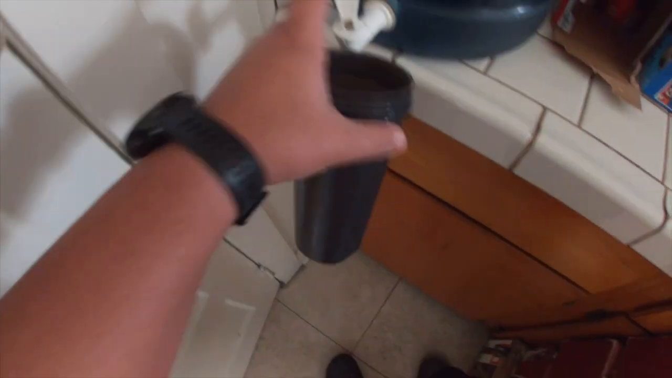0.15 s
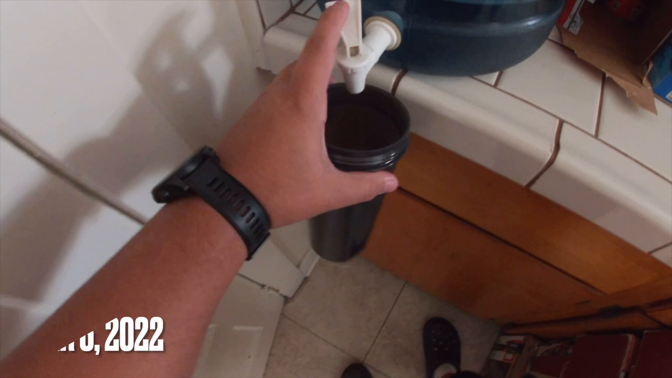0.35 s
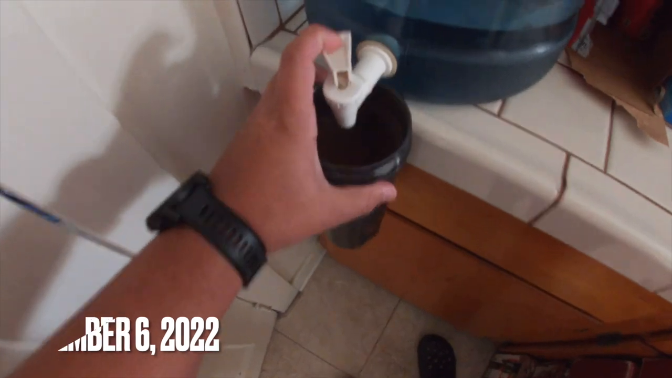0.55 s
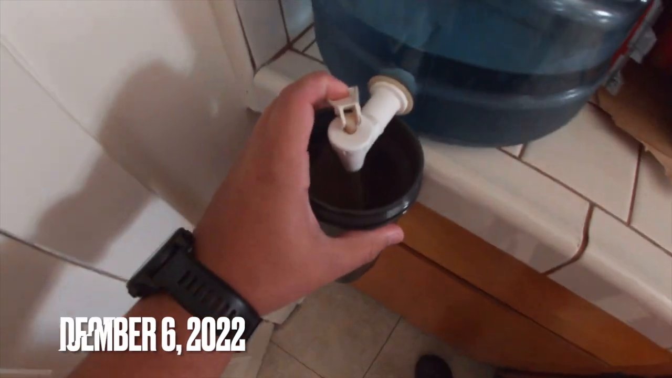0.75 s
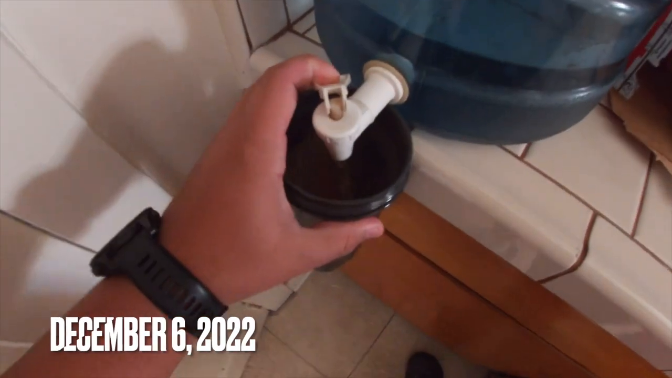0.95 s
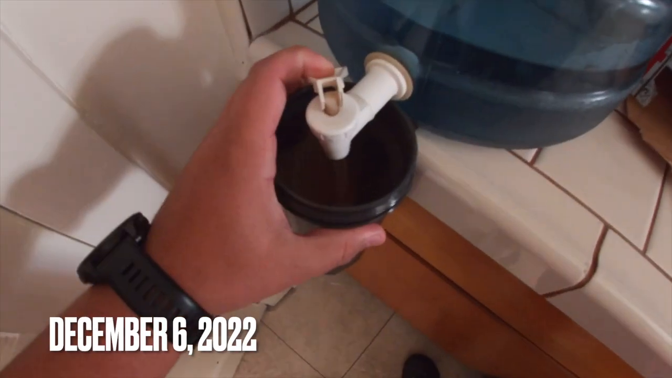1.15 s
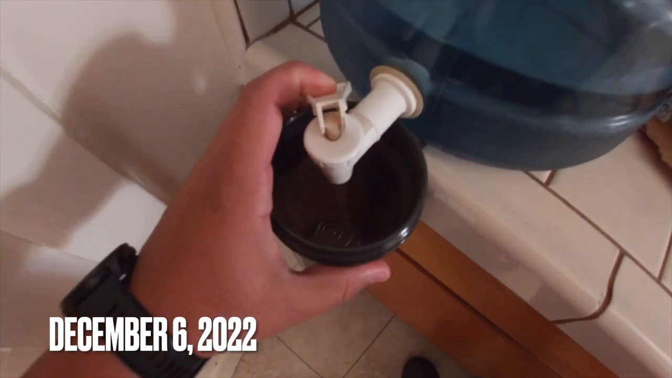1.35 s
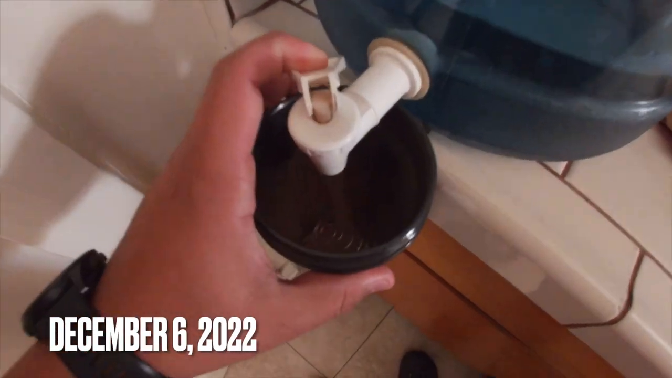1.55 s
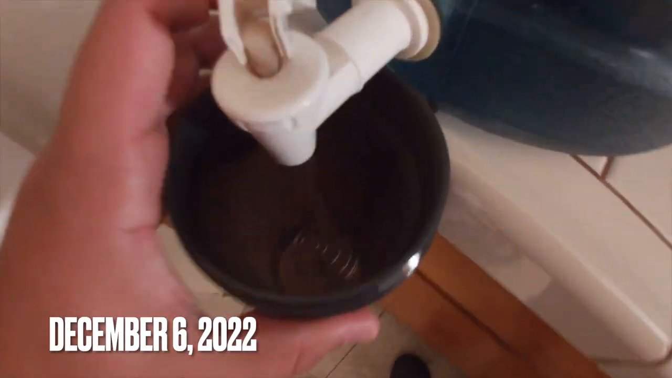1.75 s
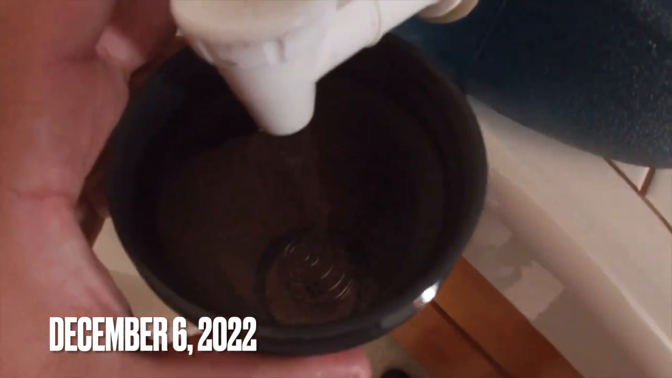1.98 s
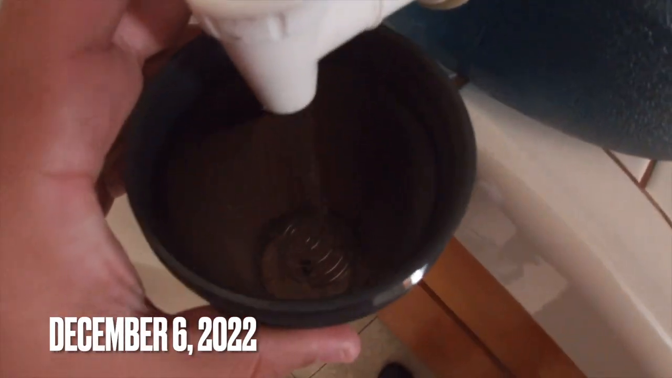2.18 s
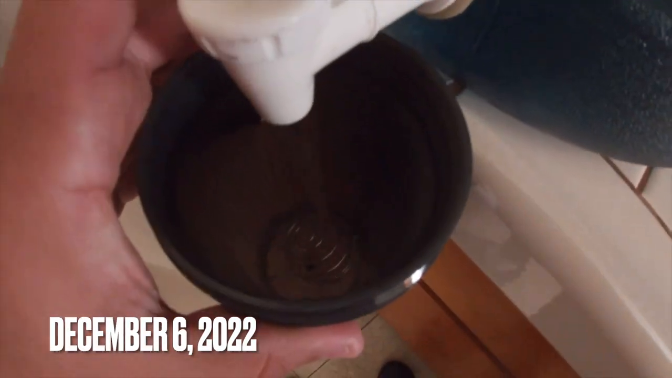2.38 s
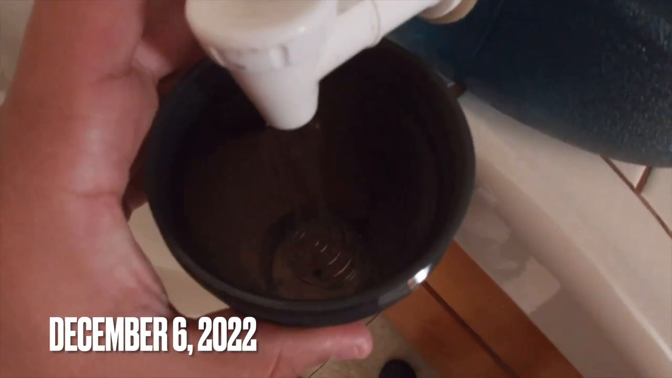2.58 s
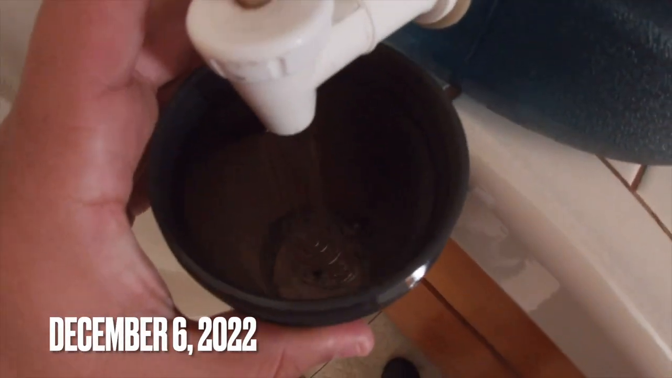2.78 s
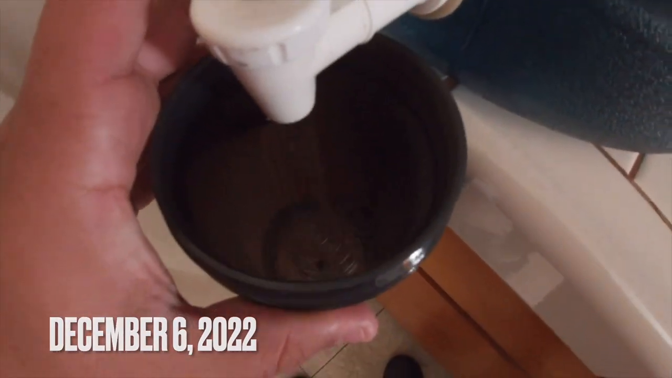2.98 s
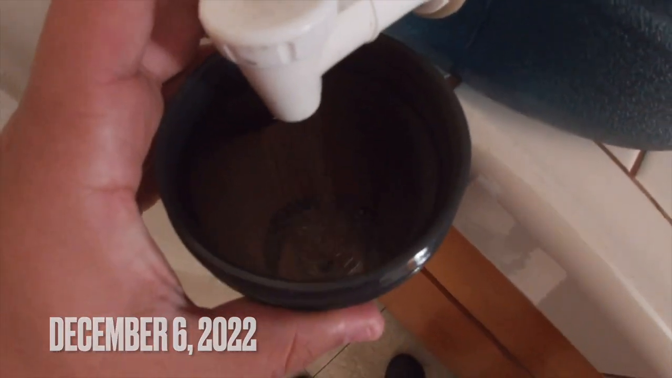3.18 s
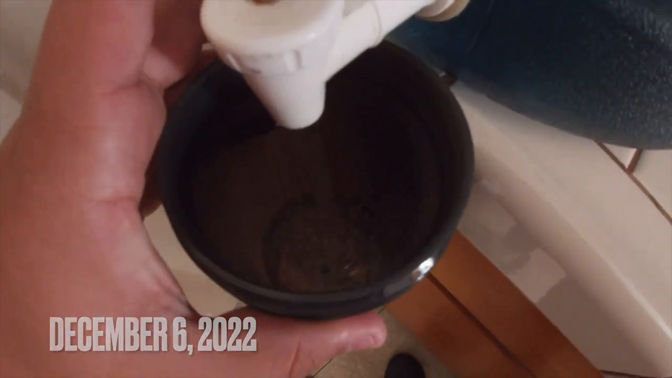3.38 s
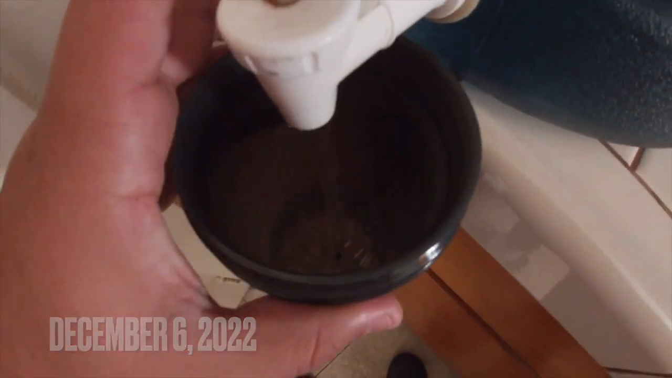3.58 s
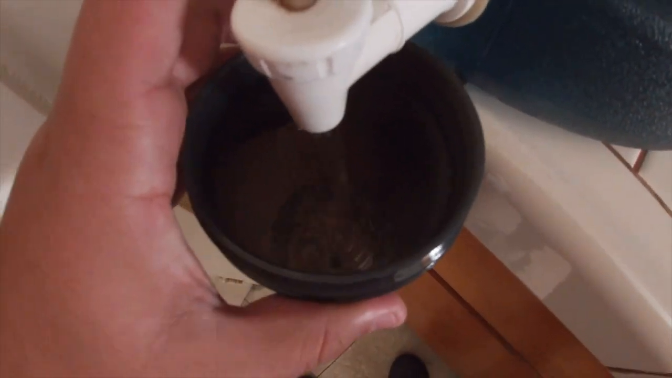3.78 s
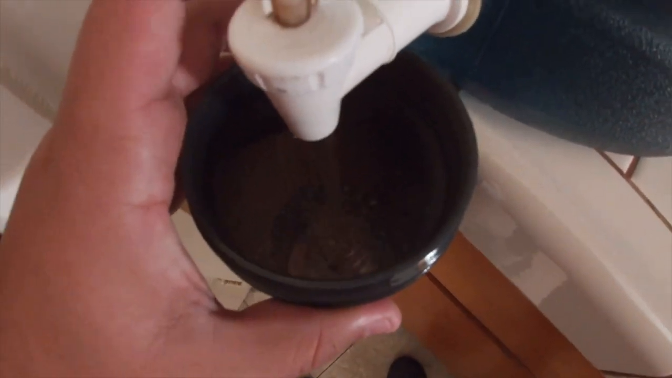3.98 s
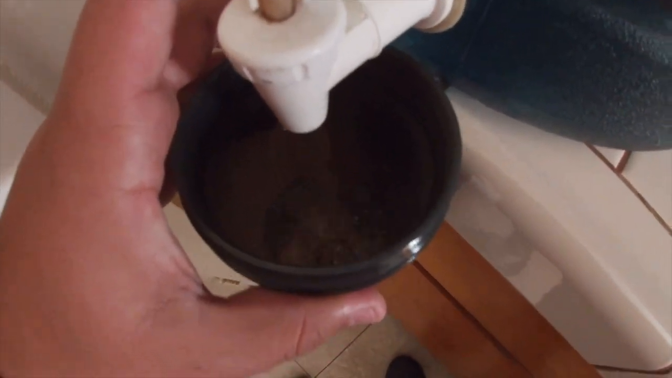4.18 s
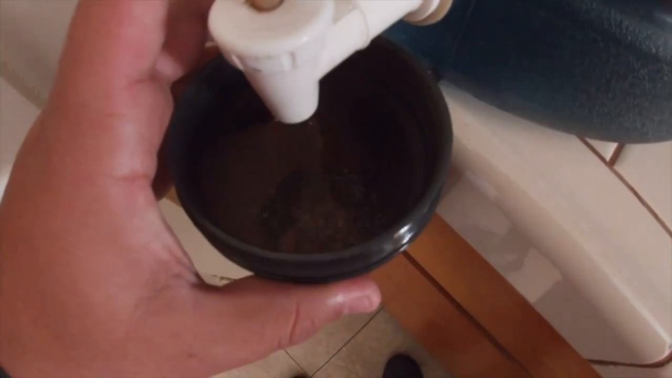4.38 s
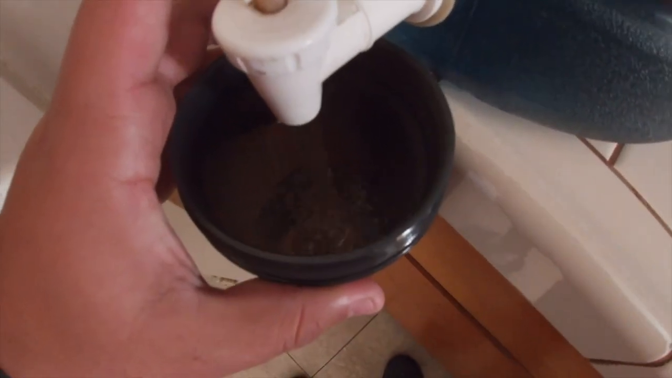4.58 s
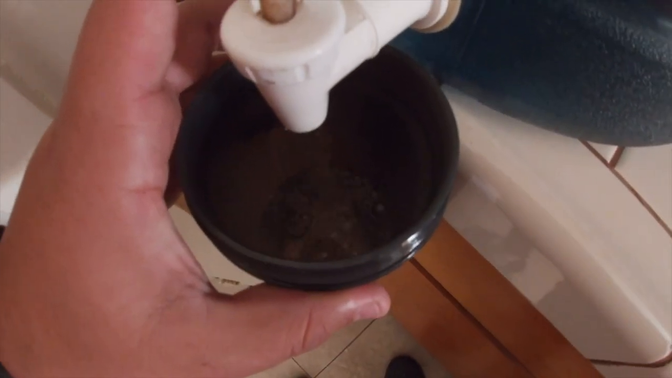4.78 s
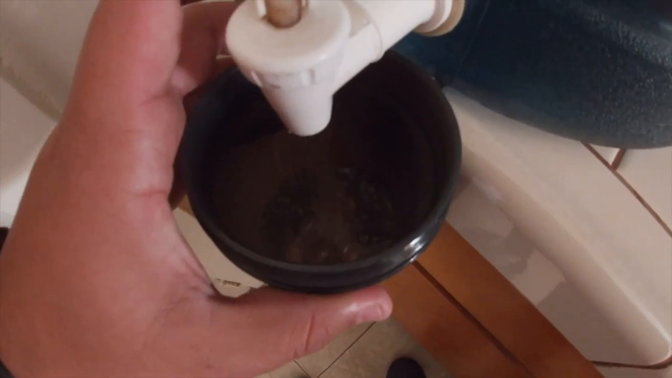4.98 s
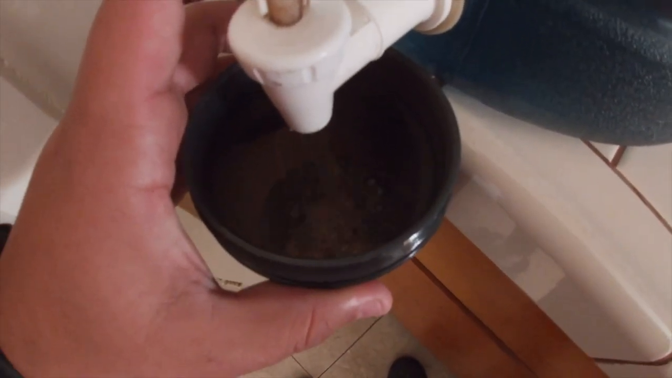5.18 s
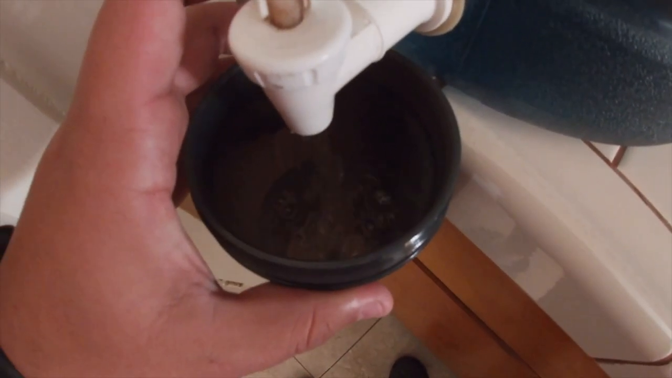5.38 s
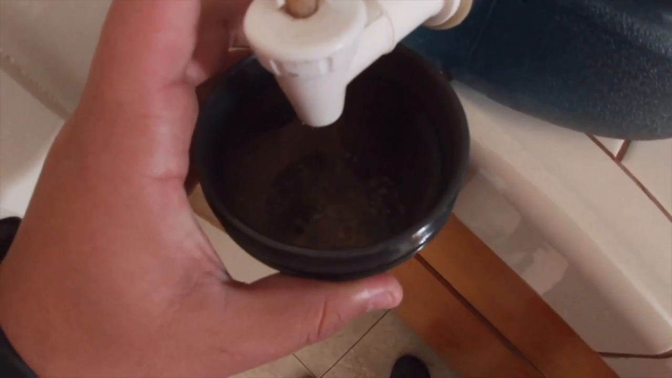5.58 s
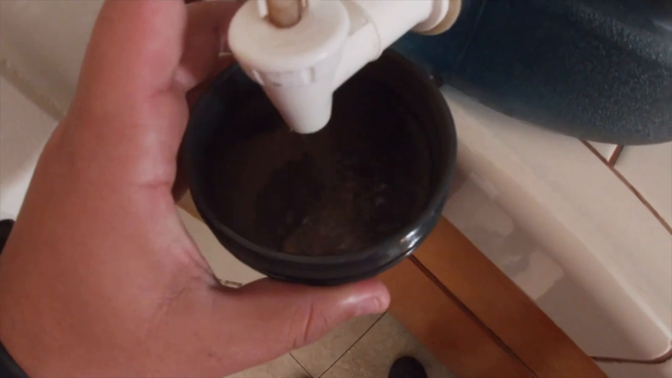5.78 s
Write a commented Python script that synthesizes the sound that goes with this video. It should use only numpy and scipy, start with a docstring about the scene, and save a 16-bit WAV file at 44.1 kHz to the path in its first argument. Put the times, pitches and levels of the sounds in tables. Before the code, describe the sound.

Close up in a small tiled kitchen, fingers slip and tick on an empty plastic bottle, which bumps the dispenser stand. A tap lever clunks open with a dull thump. Water drums briefly on the bare bottom, then turns into a steady bubbly gurgle with crisp splashes, its hollow note mostly rising until the end. Low room rumble lies underneath.

```python
"""In a kitchen, a plastic shaker bottle is brought up to a water dispenser and filled.
Ringing modes, a thump and a noise crack make it bump the stand; then the tap opens with a thump.
The stream first drums on the bare bottom, as filtered noise bursts, then plunges into the rising water.
Splashes throw spray, trap chirping bubbles and kick the air column, whose pitch mostly climbs as the bottle fills.
Finger slips and ticks, room echo, a low rumble of noise and a late, faint hum complete the scene."""
import sys
import numpy as np
from scipy import signal
from scipy.fft import rfft, irfft, next_fast_len
from scipy.io import wavfile
from scipy.ndimage import uniform_filter1d, map_coordinates

SR = 44100
rng = np.random.default_rng(int(sys.argv[2]) if len(sys.argv) > 2 else 0)


def generate_wav(sig):
    """Save sig (samples, or channels by samples) to the path in sys.argv[1] as 16-bit PCM at SR."""
    pcm = np.round(np.clip(np.atleast_2d(sig).T, -1, 1) * 32767).astype(np.int16)
    wavfile.write(sys.argv[1], SR, pcm)


N = 257741  # length [samples]

TOP_HZ = 16100  # upper limit of the sound
FLOW_S = 0.742  # the tap opens

# how hard the stream churns the water: (time [s], level [dB])
CHURNING = [(1.0, -85), (1.08, -41.5), (1.31, -38), (1.79, -34.5), (2.08, -36), (2.44, -34), (2.9, -38.5),
            (4.03, -37), (4.18, -41.5), (5.19, -36), (5.64, -48), (5.84, -41)]
# colour of knocks and rubbing on plastic: (frequency [Hz], level [dB])
PLASTIC_COLOUR = [(240, -26), (400, -13.5), (670, -22), (867, -9), (1350, -30), (2290, -9.5), (3010, -15.5),
                  (3720, -22.5), (4070, -20.5), (5270, -22), (6320, -17), (10700, -24.5), (15000, -38)]


def stream():
    """Small splashes feed the column, bubbles, slaps and spray; bubble pitches spread as the water deepens."""
    # the slap of the stream on the water: (frequency [Hz], level [dB])
    slap_colour = [(450, -34), (1000, -6), (1600, -1.5), (2800, 3.5), (4000, -1), (5500, 4), (12000, -31)]
    column_db, bubble_db, slap_db = -.5, -4, -8.5  # shares of the churning
    deep_s, shallow_db_per_s = 1.334, 84  # the air column is weaker before the water is deep
    short_s, short_db_per_s = 4.19, 2  # it weakens again once the column is short
    spray_db, spray_peak_s = -37, 1.97
    spray_rise_db_per_s, spray_fade_db_per_s = 10.5, 3  # spray grows, then fades as the fall shortens
    thinning_s, thinning_per_s = 2.1, .36  # from then on splashes come ever less often

    s, size_db = chance(rate=800, spread_db=6.5)
    happens = rng.random(len(s)) < np.exp(-thinning_per_s * (s - thinning_s))
    s, size_db = s[happens], size_db[happens]
    luck = 2 * rng.random((len(s), 7)) - 1

    column = steady(air_column(s, 1.12 * size_db + 3 * luck[:, 0]))

    # a bubble pinches off, and a droplet lands, some milliseconds from the splash
    pinch_off = s + .003 * (1 + luck[:, 5])
    bubble_spread = np.interp(s, [1.5, 4.5], [.22, .43])
    bubble_hz = 2700 * np.exp(bubble_spread * luck[:, 2])
    gurgle = steady(bubbles(pinch_off, size_db + 6 * luck[:, 1], bubble_hz))

    landing = s + .003 * luck[:, 6]
    drop_hz = 8700 * np.exp(0.485 * luck[:, 4])
    drops = steady(spray(landing, size_db + 8 * luck[:, 3], drop_hz))
    slaps = steady(coloured(bursts(s, size_db, t60=0.0088), slap_colour))

    t = clock()
    shallow_loss = shallow_db_per_s * np.maximum(deep_s - t, 0)
    short_loss = short_db_per_s * np.maximum(t - short_s, 0)
    column_gain = amp(column_db - shallow_loss - short_loss)
    spray_gain = amp(spray_db - spray_rise_db_per_s * np.maximum(spray_peak_s - t, 0))
    spray_gain = spray_gain * envelope(FLOW_S, deep_s - FLOW_S, spray_peak_s, spray_fade_db_per_s)
    churned = column_gain * column + amp(bubble_db) * gurgle + amp(slap_db) * slaps
    return gains(CHURNING)[0] * churned + spray_gain * drops


def loud_splashes():
    """The larger splashes, one by one: a drop strikes, then its crater closes and kicks the air again."""
    # (time [s], spray level [dB], air column level [dB], bubble level [dB],
    #  bubble pitch before its rise and small offset [Hz], spray pitch before its scatter [Hz])
    splash_list = [(0.9634, -19.5, -44, -53, 3330, 7000), (1.056, -12.5, -69, -51, 3550, 7140),
                   (1.1012, -10, -51, -37, 3200, 7160), (1.3177, -10, -40, -28.5, 2670, 7350),
                   (1.3454, -27, -27.5, -31, 3040, 6750), (1.5176, -20.5, -25.5, -26.5, 2820, 6260),
                   (1.6102, -21.5, -29, -28.5, 2710, 6700), (1.7298, -29, -18.5, -26.5, 2840, 7420),
                   (1.7523, -41, -24, -31, 2420, 7210), (1.7846, -27, -20, -28, 2620, 5430),
                   (1.8501, -38, -24, -37, 2750, 7500), (1.8864, -23, -23, -43, 2760, 7340),
                   (1.9064, -21, -24, -46, 2680, 7400), (2.0657, -11, -24.5, -25.5, 2930, 7470),
                   (2.1778, -14, -25, -26, 2900, 8200), (2.2359, -34, -25.5, -29, 2680, 5380),
                   (2.3143, -28, -24, -35, 2700, 11300), (2.3845, -17, -25.5, -26.5, 2860, 7950),
                   (2.4186, -20, -21.5, -29, 2980, 15100), (2.4529, -51, -21.5, -25, 3100, 5300),
                   (2.4868, -14, -39, -26, 2850, 7830), (2.508, -16, -21.5, -29, 2900, 11800),
                   (2.6328, -26, -24, -25.5, 2400, 9140), (2.6433, -23, -28, -23.5, 2930, 9110),
                   (2.6958, -13.5, -44, -31, 3020, 7530), (2.7222, -15.5, -21, -34, 3170, 7900),
                   (2.803, -15, -36, -35.5, 3070, 7640), (2.871, -18, -37, -33, 2890, 13500),
                   (3.0942, -15, -29.5, -35, 3030, 9300), (3.1259, -31, -24, -36, 3160, 6170),
                   (3.1615, -21, -30.5, -22.5, 3220, 5500), (3.2032, -19.5, -26, -30.5, 2960, 6440),
                   (3.3595, -14, -23.5, -29, 2870, 8900), (3.3874, -20, -21.5, -35, 2250, 6440),
                   (3.452, -23, -20, -33, 2920, 8140), (3.6038, -31, -25.5, -29.5, 2500, 8440),
                   (3.7831, -12.5, -28, -32, 3680, 12700), (3.8766, -42, -19.5, -32, 2360, 6940),
                   (4.0004, -14, -30, -28.5, 3900, 6010), (4.0422, -12, -26.5, -27, 3800, 12200),
                   (4.1336, -18, -45, -30.5, 2430, 14600), (4.1634, -13.5, -21.5, -30, 2600, 7850),
                   (4.1948, -15, -23, -36, 3350, 6680), (4.359, -22.5, -25.5, -30.5, 3020, 5730),
                   (4.3742, -17, -29.5, -26, 2440, 12700), (4.7007, -16, -23.5, -31.5, 3960, 5290),
                   (4.7725, -21.5, -24.5, -36, 2180, 5440), (4.8822, -17, -32, -32, 1890, 12000),
                   (4.9549, -20.5, -26, -30, 3780, 12000), (5.1023, -23.5, -24, -44, 2290, 8100),
                   (5.165, -12.5, -31, -36, 1900, 6700), (5.185, -30, -23, -32, 2280, 7600),
                   (5.321, -16.5, -24, -29, 2160, 12200), (5.369, -13, -29, -37, 3940, 15400),
                   (5.439, -11, -32, -35, 2030, 5660), (5.4891, -20, -30, -32.5, 3860, 5800),
                   (5.7166, -17, -40, -54, 2160, 7730), (5.7677, -22, -58, -33.5, 2450, 5500)]
    collapse_s, collapse_db = 0.004507, -6  # delay before random stretching; change of the second kick
    s, spray_db, column_db, bubble_db, bubble_hz, spray_hz = np.transpose(splash_list)
    closing = s + collapse_s * rng.uniform(0.624, 1.384, len(s))
    first_kick = air_column(s, column_db + 6.5)
    second_kick = air_column(closing, column_db + 3.5 + collapse_db)
    ringing = bubbles(s, bubble_db + 10, bubble_hz)
    return first_kick + second_kick + ringing + spray(s, spray_db - 3.5, spray_hz)


def chirps():
    """Some bubbles ring on longer while they rise, each a clear upward chirp, at random moments."""
    s, size_db = chance(rate=26, spread_db=4)
    hz = 3054 * np.exp(0.255 * rng.uniform(-0.914, 1, len(s)))
    t60 = np.full(len(s), 0.0256)
    ring = pings(s, size_db + 2.5, hz, t60, glide=0.38, attack=0.0018, size=1600)
    return gains(CHURNING)[0] * ring


def air_column(times, db):
    """Splashes kick the air above the water, whose rocking surface bends the note; a wall mode adds a little."""
    # the air column's middle note: (time [s], pitch [Hz])
    column_note = [(.9, 834), (1.35, 927), (1.6, 947), (1.9, 967), (2.15, 1058), (2.65, 1020), (2.95, 1072),
                   (3.3, 1191), (3.8, 1252), (4.4, 1257), (4.7, 1342), (5.3, 1448), (5.84, 1630)]
    luck = rng.standard_normal((len(times), 3)).clip(-2, 2)
    hz = np.interp(times, *np.transpose(column_note)) * np.exp(.025 * luck[:, 0])
    t60 = 0.034 * np.exp(0.083 * luck[:, 1])
    air = pings(times, db, hz, t60, glide=0.0055, attack=.0001, size=2200)
    wall_hz = 715 * np.exp(0.05 * luck[:, 2])
    wall_t60 = np.full(len(times), .026)
    wall = pings(times, db - 17.5, wall_hz, wall_t60, glide=0, attack=0.00007, size=1200)
    return air + wall


def bubbles(times, db, hz):
    """Trapped bubbles ring briefly and chirp upward as they near the surface."""
    t60 = 31 / hz * np.exp(.5 * rng.uniform(-1, 1, len(times)))
    return pings(times, db, hz * 0.9605, t60, glide=0.21, attack=0.0001, size=1000)


def spray(times, db, hz, count=3):
    """A droplet snaps and rattles between the walls, beside a quick cluster of tiny, mostly weakening bubbles."""
    luck = rng.uniform(-1, 1, (len(times), 3, count))
    turn = np.arange(count)
    born = times[:, None] + 0.0021 * turn * (1 + .5 * luck[:, 0])
    # the first bubble keeps the given pitch; later ones scatter around it
    pitch = hz[:, None] * np.exp(0.417 * luck[:, 1] * (turn > 0))
    pitch = np.minimum(pitch, TOP_HZ).ravel()
    size_db = db[:, None] - 4.1 * turn + 2 * luck[:, 2]
    fizz = pings(born.ravel(), size_db.ravel(), pitch * .96, 58 / pitch, glide=0.2, attack=0.000043, size=450)
    snap = bursts(times, db - 9.5, t60=0.0052)
    rattle = bursts(times, db - 19.0, t60=0.047)
    return fizz + snap + rattle


def patter():
    """Drops drum on the bare plastic and burst into spray, muffled as water covers it."""
    # the bare bottom's answer to a drop: (frequency [Hz], level [dB])
    bottom_colour = [(150, -1), (330, 12), (500, 10), (680, -3), (920, 2.5), (1250, -26.5), (1900, -19.5),
                     (2900, -10), (4200, -16.5), (7100, -5.5), (10000, -11), (16000, -18.5)]
    attack_s, covered_s, cover_db_per_s = .06, 1.17, 37
    s, size_db = chance(rate=600, spread_db=4.5)
    drumming = steady(coloured(bursts(s, size_db, t60=0.002), bottom_colour))
    spray_hz = 7000 * np.exp(0.16 * rng.standard_normal(len(s)))
    spatter = steady(coloured(spray(s, size_db, spray_hz), bottom_colour))
    gain = amp(-37.5) * envelope(FLOW_S, attack_s, covered_s, cover_db_per_s)
    return gain * (drumming + amp(-1) * spatter)


def knocks():
    """Each knock rings the stand's modes, mixed by where it lands, with a dull thump and a crack."""
    # (time [s], ring level [dB], crack level [dB], thump level [dB],
    #  place [0 = side of the stand, 1 = tap])
    knock_list = [(0.2153, -23, -25.5, -24, 0.02), (0.7195, -16, -43, 3, 0.82),
                  (1.077, -41.5, -60, -29, 0.24)]
    # modes of the dispenser and its stand: (frequency [Hz], time to fall 60 dB [s],
    #  level when bumped [dB], level when the tap opens [dB])
    stand_modes = [(202, 0.42, -24, -36), (262, 0.18, -9, -15.5), (318.5, 0.25, -0.5, -9),
                   (386, 0.046, 7, 6.5), (435.6, 0.15, 3.5, -13), (473.7, 0.32, 0, -12),
                   (565, 0.2, -12.5, 2), (730, 0.066, 0.5, -14), (793, 0.32, -20.5, -14),
                   (837, 0.029, 8, 13), (879, 0.14, -1, -4), (1024, 0.053, 3.5, 0.5),
                   (1092, 0.107, -5, -32), (1328, .12, -7.5, -15), (1553, .12, -12.5, -25),
                   (2530, .06, -20, -27)]
    hz, t60, bump_db, tap_db = np.transpose(stand_modes)
    out = np.zeros(N)
    for s, db, crack_db, thump_db, at_tap in knock_list:
        mode_db = bump_db + np.clip(at_tap, 0, 1) * (tap_db - bump_db)
        arrival = s + rng.uniform(0, 0.00189, len(hz))  # the blow takes a moment to spread
        out += pings(arrival, db + mode_db, hz, t60, glide=0, attack=0.001, size=18000)
        time = np.array([s])
        out += pings(time, np.array([thump_db]), np.array([680]), np.array([.011]),
                     glide=0, attack=0.0015, size=1500)
        crack = bursts(time, np.array([crack_db + 22.5]), t60=0.058, size=5000)
        out += coloured(crack, PLASTIC_COLOUR)
    return out


def handling():
    """Skin slips on the empty bottle and faintly sounds its air column, with a few sharper ticks."""
    # fingers shift on the bottle: (time [s], length [s], level [dB])
    grip_list = [(0.0, 0.044, -42.5), (0.234, 0.06, -41.5), (0.435, 0.071, -44), (0.557, 0.035, -44.5)]
    # small plastic ticks of bottle and lever: (time [s], level [dB])
    tick_list = [(0.0157, -34), (0.0632, -38), (0.149, -34.5), (0.186, -27), (0.2294, -22), (0.299, -24.5),
                 (0.4373, -29.5), (0.4418, -19.5), (0.4917, -21.5), (0.5913, -21), (0.6222, -33.5),
                 (0.649, -46), (0.717, -19), (0.737, -16.5), (0.772, -14.5)]
    # the air in the empty bottle: (frequency [Hz], time to fall 60 dB [s], level [dB])
    hollow_modes = [(878, 0.063, -6), (2430, 0.026, -10)]
    attack_s, release_db_per_s = 0.0027, 416

    rub = np.zeros(N)
    for start, length, grip_db in grip_list:
        rub += amp(grip_db) * envelope(start, attack_s, start + length, release_db_per_s)
    slip_times, slip_db = chance(rate=560, spread_db=8.0)
    slips = rub * steady(coloured(bursts(slip_times, slip_db, t60=0.0065), PLASTIC_COLOUR))

    drive = rub * rng.standard_normal(N)
    t = clock()[:SR // 4]
    hollow = np.zeros(N)
    for hz, t60, mode_db in hollow_modes:
        ring = np.sin(2 * np.pi * hz * t) * np.exp(-np.log(1000) * t / t60)
        hollow += amp(mode_db) * signal.fftconvolve(drive, ring / np.linalg.norm(ring))[:N]

    s, db = np.transpose(tick_list)
    ticks = coloured(bursts(s, db + 12, t60=0.028), PLASTIC_COLOUR) + air_column(s, db - 29)
    return amp(-3.5) * slips + hollow + ticks


def room(x):
    """The tiled kitchen answers with decaying noise, 5 ms late, its fading time set by frequency."""
    # (frequency [Hz], time to fall 60 dB [s])
    kitchen_decay = [(150, 0.55), (500, 0.27), (2000, 0.31), (8000, 0.4), (16000, 0.047)]
    hz, t, z = signal.stft(rng.standard_normal(SR // 2), SR, nperseg=256)
    fading = amp(-60 * t / along(kitchen_decay, hz)[:, None])
    tail = signal.istft(z * fading, SR, nperseg=256)[1]
    delayed = np.pad(tail, (SR // 200, 0))
    return signal.fftconvolve(x, delayed / np.linalg.norm(tail))[:N]


def background():
    """A low rumble of coloured noise fills the kitchen; late on, a faint wavering sine hum drifts in."""
    # colour of the rumble: (frequency [Hz], level [dB])
    ambient_colour = [(20, -5), (45, -0.5), (85, -0.5), (150, -10), (230, -13), (350, -9.5), (550, -19),
                      (1000, -29.5), (3000, -31.5), (8000, -44), (16000, -52)]
    # rumble level before a fixed boost: (time [s], level [dB])
    rumble_level = [(0.0, -50.5), (0.39, -50.5), (2.67, -60), (4.63, -55.5), (4.7, -54.5), (5.34, -56.5),
                    (5.84, -55.5)]
    hum_hz, hum_waver, hum_db = 250, 0.025, -60  # waver as a share of the pitch
    hum_start_s, hum_attack_s = 4.08, 0.51
    t = clock()
    noise = unit(coloured(rng.standard_normal(N), ambient_colour))
    rumble = amp(3.5) * gains(rumble_level)[0] * noise
    # smooth random curve through four points a second
    waver = map_coordinates(rng.standard_normal(size=32), [t * 4], mode="mirror")
    phase = 2 * np.pi * np.cumsum(hum_hz * (1 + hum_waver * waver)) / SR
    hum = amp(hum_db) * np.clip((t - hum_start_s) / hum_attack_s, 0, 1) * np.sin(phase)
    return rumble + hum


def pings(times, db, hz, t60, glide, attack, size):
    """Damped sines: they fall 60 dB in t60 while their pitch rises by the share glide."""
    t = np.arange(size) / SR
    age = t / t60[:, None]
    phase = 2 * np.pi * hz[:, None] * t * (1 + glide * np.minimum(age, 2) / 2)
    shape = np.exp(-np.log(1000) * age) * (1 - np.exp(-t / attack))
    return place(times, amp(db)[:, None] * np.sin(phase) * shape)


def bursts(times, db, t60, size=600):
    """Short cracks of noise that die away evenly in dB."""
    decay = np.exp(-np.log(1000) * np.arange(size) / SR / t60)
    noise = rng.standard_normal((len(times), size))
    return place(times, amp(db)[:, None] * decay * noise)


def place(times, grains):
    """Sum of one grain (row) at each time."""
    start = np.round(times * SR).astype(int).clip(0)
    index = start[:, None] + np.arange(grains.shape[1])
    return np.bincount(index.ravel(), grains.ravel(), N)[:N]


def chance(rate, spread_db):
    """Random times (rate per second) and bell-curve sizes (dB, capped above) of irregular impacts."""
    times = np.sort(rng.uniform(0, N / SR, int(rate * N / SR)))
    return times, spread_db * np.minimum(rng.standard_normal(len(times)), 1.7)


def coloured(x, points, size=8192):
    """x through a filter with the given spectrum that never sounds ahead of its input."""
    spectrum = amp(along(points, np.fft.rfftfreq(size, 1 / SR)))
    cepstrum = irfft(np.log(spectrum + 1e-6))
    # folding the cepstrum forward gives minimum phase
    cepstrum[1:size // 2] *= 2
    cepstrum[size // 2 + 1:] = 0
    return signal.fftconvolve(x, irfft(np.exp(rfft(cepstrum))))[:N]


def steady(x):
    """x with its slow level, over a quarter second, held near rms 1."""
    return x / np.sqrt(np.abs(uniform_filter1d(x ** 2, SR // 4)) + 1e-12)


def unit(x):
    """x scaled to rms 1."""
    return x / np.sqrt(np.mean(x ** 2) + 1e-20)


def amp(db):
    """Decibels to an amplitude factor."""
    return 10 ** (np.asarray(db) / 20)


def along(points, hz):
    """Values between (Hz, value) points on a log axis."""
    f, v = np.transpose(points)
    return np.interp(np.log(hz + 1), np.log(f), v)


def gains(rows):
    """One gain per sample for each dB column, at -120 dB before the first row."""
    s, *cols = np.transpose(rows)
    return np.array([amp(np.interp(clock(), s, c, left=-120)) for c in cols])


def clock():
    """The time of every sample [s]."""
    return np.arange(N) / SR


def envelope(start, attack, end, release_db_per_s):
    """A gain that rises from start, holds until end, then dies away."""
    t = clock()
    return np.clip((t - start) / attack, 0, 1) * amp(-release_db_per_s * np.maximum(t - end, 0))


def scene():
    """Water coloured by the bottle, plastic noises, their room echoes and the background."""
    # the bottle's colour on the water: (frequency [Hz], level [dB])
    bottle_colour = [(140, -35), (300, -10), (560, -10), (720, -4), (1450, -1), (1850, -2.5), (2300, -2),
                     (3200, 2.5), (3500, -3), (4100, 4), (4500, -8.5), (5100, -8.5), (5400, -1), (6000, -2),
                     (8600, 3), (9500, -2.5), (12500, 3.5), (16000, -2)]
    water = coloured(loud_splashes() + stream() + chirps() + patter(), bottle_colour)
    plastic = knocks() + handling()
    echoes = amp(-16.0) * room(water) + amp(-8.0) * room(plastic)
    return (water + plastic + echoes + background())[None]


def record(dry):
    """Removes everything from the upper limit on."""
    size = next_fast_len(N + SR // 2)
    kept = np.fft.rfftfreq(size, 1 / SR) < TOP_HZ
    return irfft(rfft(dry, size) * kept, size)[:, :N]


dry = scene()
out = record(dry)
generate_wav(out)
```